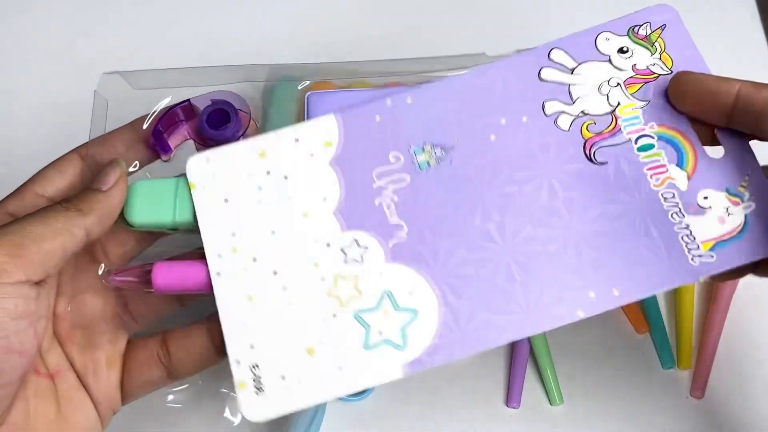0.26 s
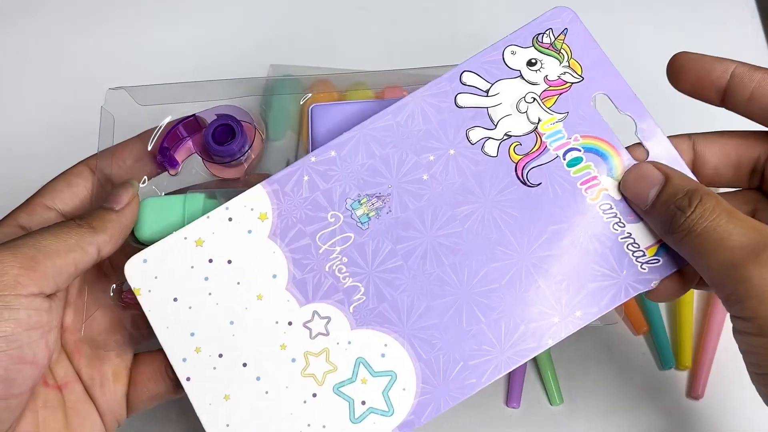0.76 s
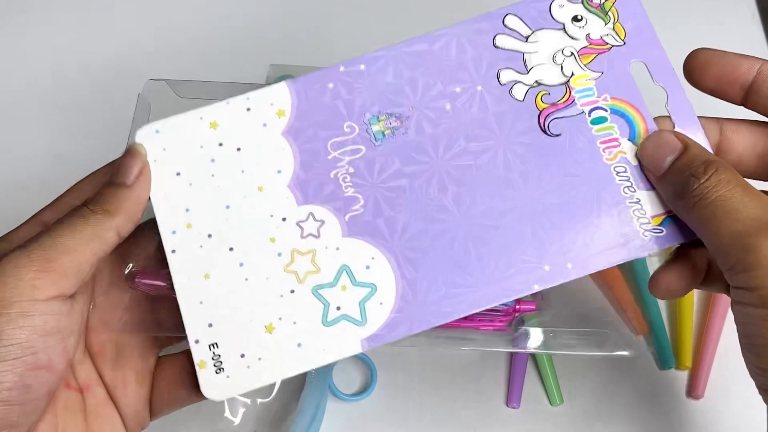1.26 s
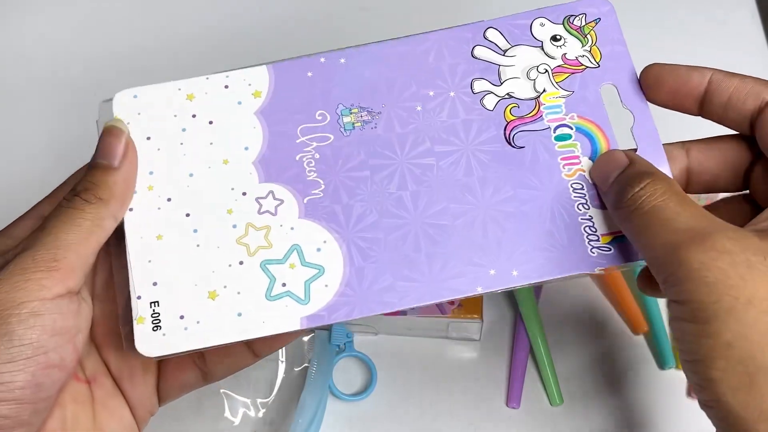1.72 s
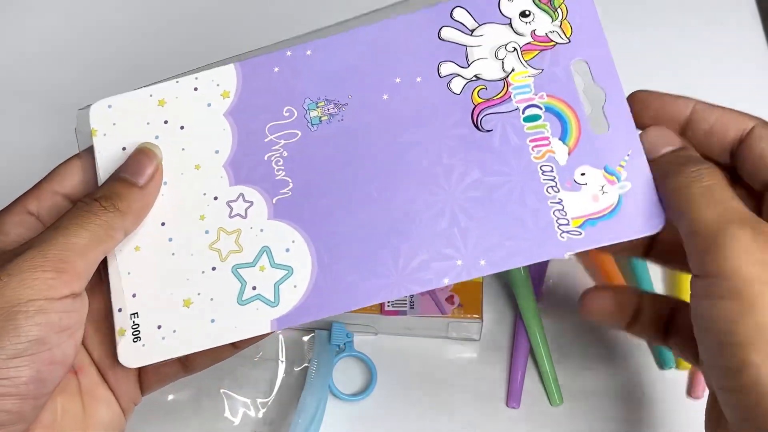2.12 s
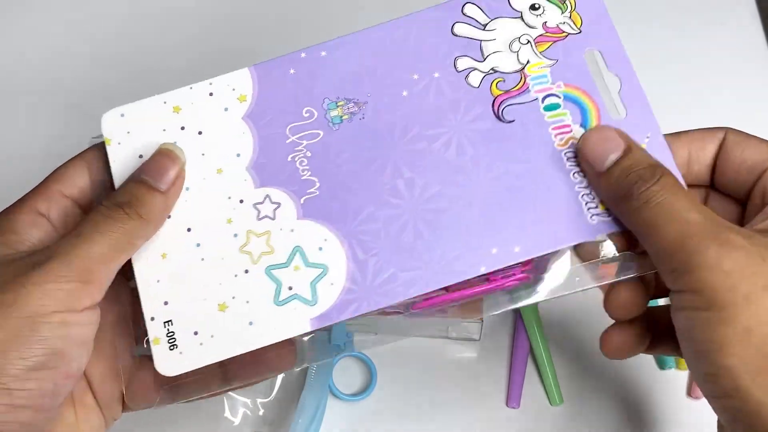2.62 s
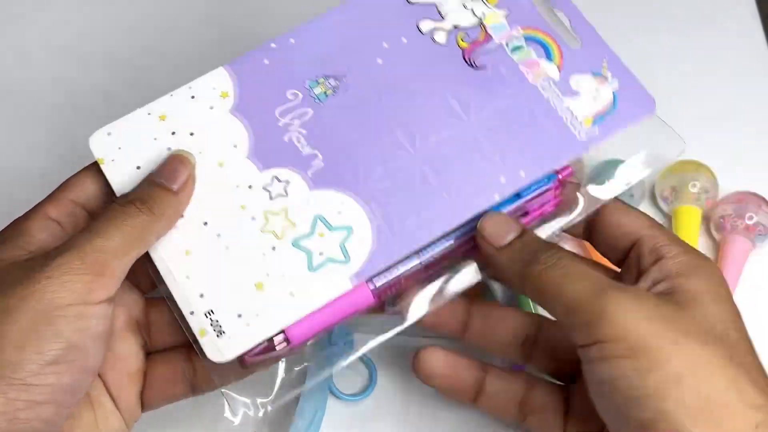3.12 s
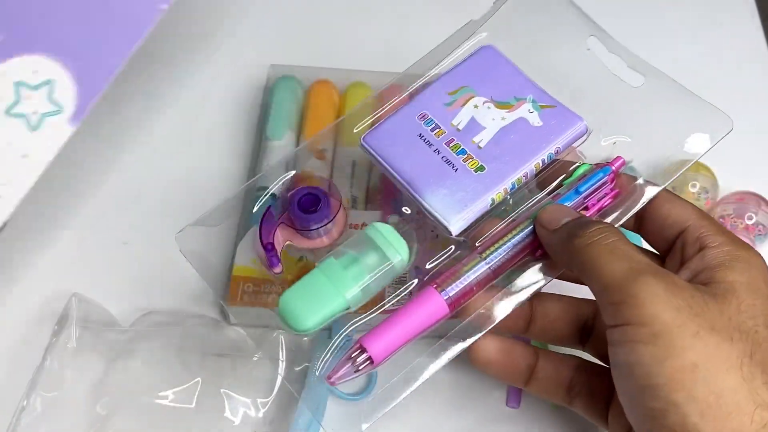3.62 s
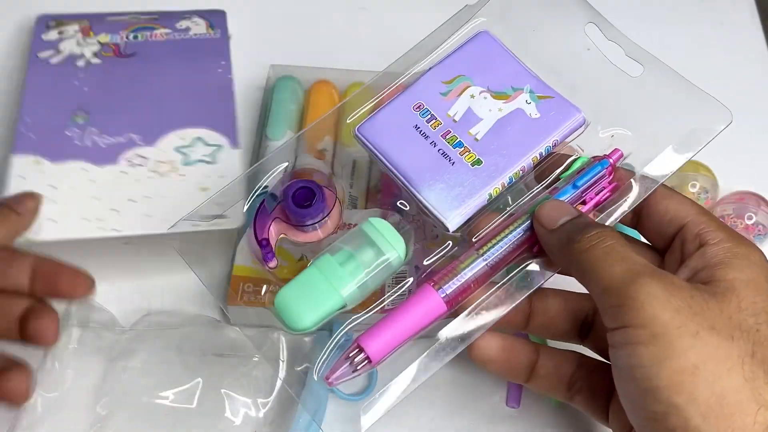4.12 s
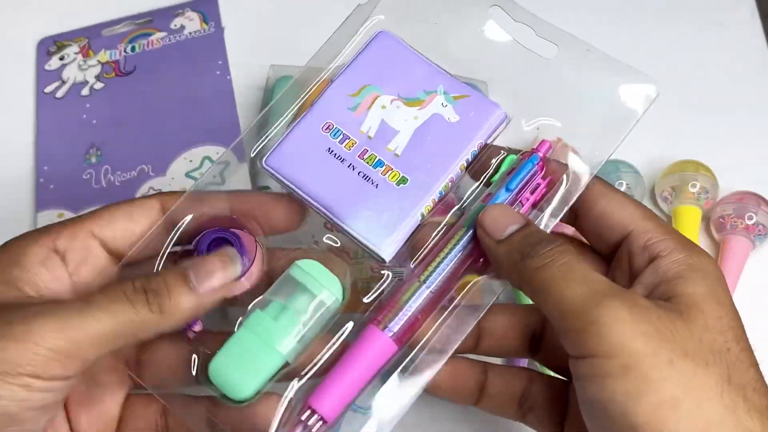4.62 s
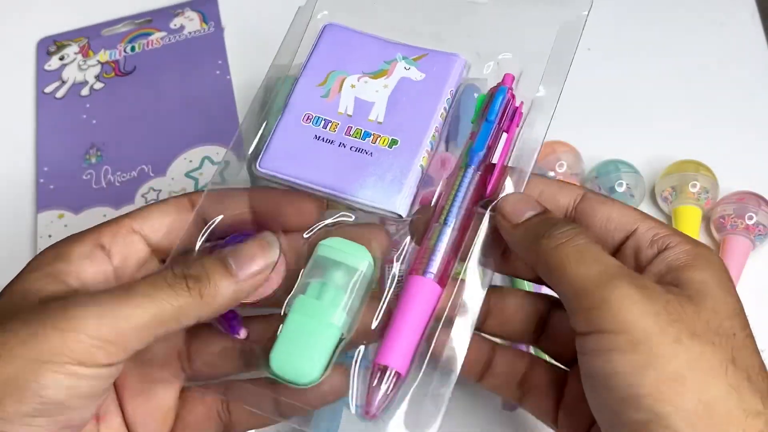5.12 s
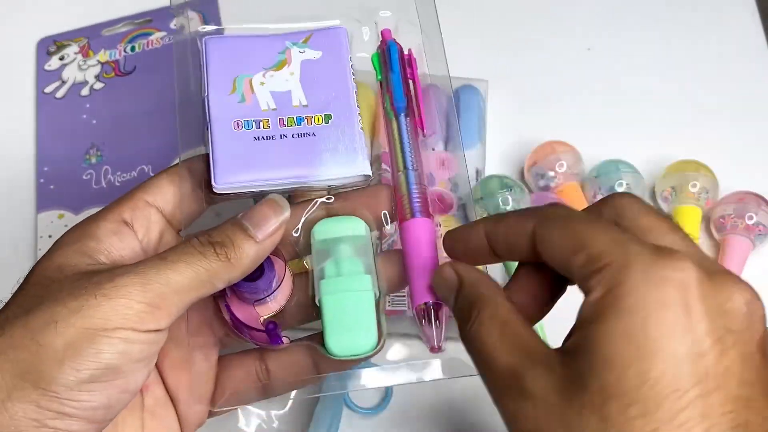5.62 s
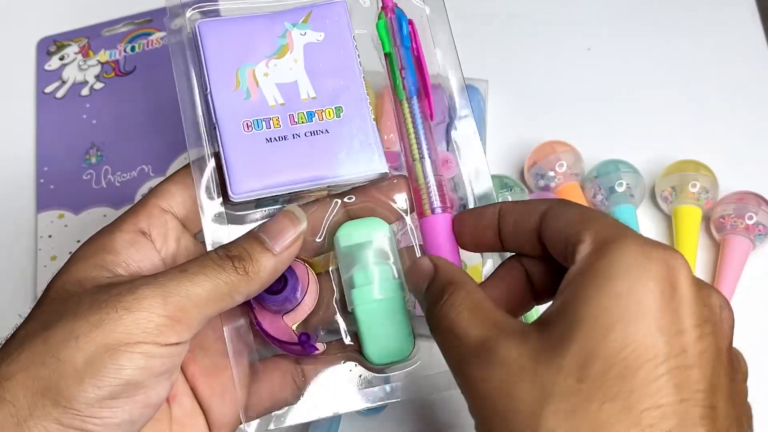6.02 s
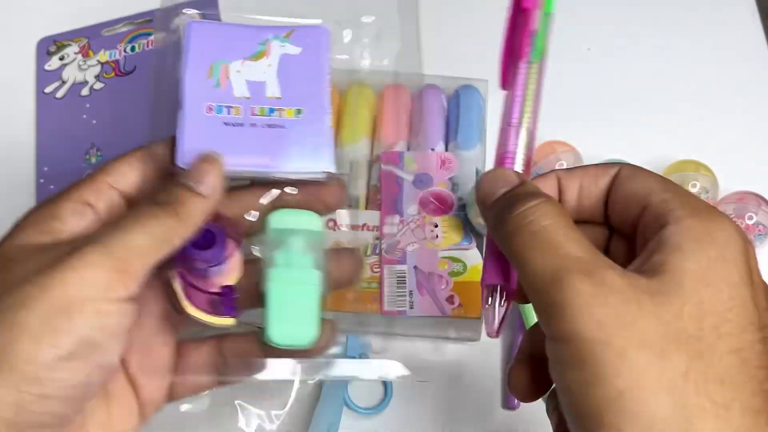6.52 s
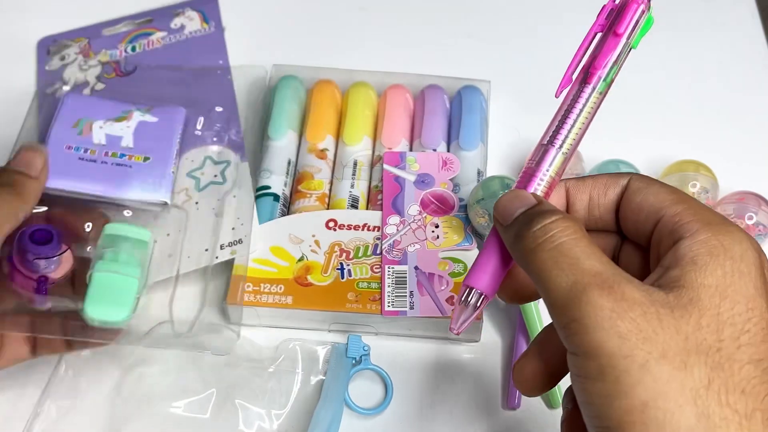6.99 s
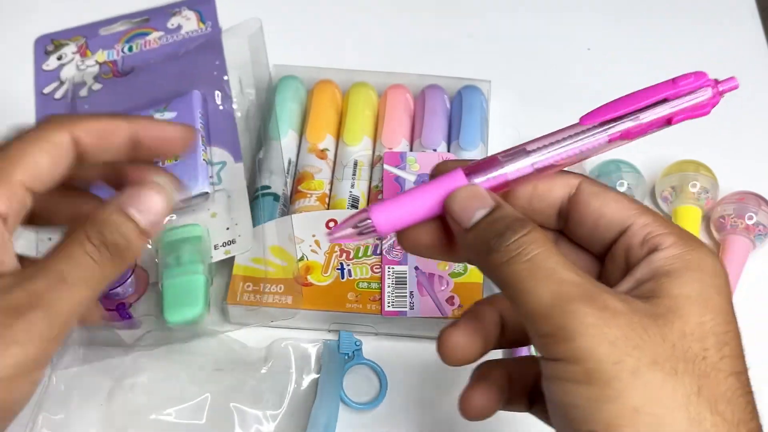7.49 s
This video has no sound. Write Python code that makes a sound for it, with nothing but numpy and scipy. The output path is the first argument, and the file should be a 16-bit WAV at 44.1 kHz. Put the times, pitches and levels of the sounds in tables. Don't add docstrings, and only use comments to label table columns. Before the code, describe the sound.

Hands handle a stiff plastic blister tray with a card backing, very close to a phone in a small hard room. Quiet ticks and rubs come first, with crisp cracks around one and two and a half seconds. The card slides out and taps down softly. Near six seconds the tray snaps sharply, loudest as the pen springs out with a short hollow ring, then lighter clicks follow over low traffic rumble.

```python
import sys
import numpy as np
from scipy import signal
from scipy.fft import rfft, irfft, next_fast_len
from scipy.io import wavfile
from scipy.ndimage import uniform_filter1d, map_coordinates

SR = 44100
rng = np.random.default_rng(int(sys.argv[2]) if len(sys.argv) > 2 else 0)


def voltage_ratio(level):
    return 10 ** (np.asarray(level, float) / 20)


def store_wav(level_fs):
    pcm = np.round(np.clip(np.atleast_2d(level_fs), -1, 1) * 32767)
    wavfile.write(sys.argv[1], SR, pcm.T.astype(np.int16))


N = 341775

# start_s, level_db, pitch_hz, length_ms, sharpness_db
BUCKLES = [(0.9962, -29.5, 1196, 1.15, -9.5), (1.0034, -34, 2720, 4.8, -5), (1.457, -44, 1340, 4.4, -1.5),
           (1.91, -38, 2560, 1.3, 5.5), (1.949, -40, 1840, 3, -6), (2.5503, -29, 2480, 17.4, -1.5),
           (3.253, -41.5, 850, 5.4, -9), (3.3826, -41, 1520, 16, 9.5), (3.397, -39, 2600, 21.4, 4),
           (3.4869, -38, 3350, 2.9, 0.5), (4.207, -36.5, 1150, 2.6, -14), (4.2134, -32.5, 1015, 2.2, -6),
           (4.6187, -33.5, 1950, 4.7, -14.5), (4.643, -38, 986, 0.48, -21), (5.8386, -23, 1100, 2.2, -3.5),
           (5.8392, -28.5, 4430, 1.2, -3.5), (6.3395, -26, 6050, 1.7, -6), (6.037, -30, 5900, 1.4, -6),
           (5.9755, -29, 4600, 1.2, -2), (6.0369, -21, 4540, 2.7, 3.5), (6.3386, -15, 1146, 3.4, -3),
           (6.539, -39.5, 2904, 9, -9), (6.726, -40.5, 3000, 6.6, -13), (6.855, -34.5, 2440, 1.75, -9),
           (7.0731, -34.5, 1140, 2.7, -19.5), (7.2577, -38, 877, 1.3, -16), (7.326, -39, 1240, 3.05, -27)]


def buckles():
    rows = []
    for start, db, hz, length_ms, sharp_db in BUCKLES:
        body_db = -3 - 0.45 * sharp_db
        rows.append((start, db, body_db, sharp_db, hz, length_ms))
    return cracks(rows)


# start_s, level_db, pitch_hz, length_ms
SNAPS = [(.1695, -49.5, 3300, 7), (.2681, -49, 1130, 6.5), (.3301, -53, 2690, 0.6), (.3449, -49, 2820, 1.9),
         (.8181, -60, 1170, 9.7), (1.3432, -51, 2800, 4.6), (1.5433, -54, 1790, 4.9), (1.8, -53, 805, 4.7),
         (1.8698, -48, 2510, 2.5), (1.9729, -46, 3180, 12.6), (2.1122, -48, 2680, 0.66),
         (2.2005, -50.5, 2350, 7.4), (2.4606, -51.5, 2530, 7.2), (2.4702, -55.5, 2100, 9.7),
         (6.3432, -34, 4300, 1.3), (3.4642, -45, 2470, 9.1), (4.5305, -57, 2800, 17),
         (4.6015, -47.5, 2480, 14), (4.9678, -48.5, 2400, 5.2), (5.1416, -65, 730, 13),
         (5.1632, -58, 2573, 1.2), (6.1918, -50.5, 579, 27)]


def snaps():
    return cracks(same_kind(SNAPS, body_db=1.5, edge_db=-0.5))


# start_s, level_db, pitch_hz, length_ms
KNOCKS = [(.2305, -50.5, 1143, 4.3), (.2554, -46.5, 2580, 7), (.3519, -70, 1180, 4.7),
          (.3632, -46.5, 2160, 1.3), (.377, -53, 1130, 2), (.5905, -63, 1040, 15),
          (1.1334, -46.5, 1840, 4.9), (2.218, -58, 980, 4.6), (2.2274, -54.5, 950, 3.2),
          (2.8959, -49.5, 900, 1.2), (3.1684, -56.5, 2260, 82), (3.2402, -46.5, 1310, 5.8),
          (3.5147, -49, 860, 1.7), (4.1317, -63, 2650, 3.4), (4.154, -55, 1180, 10.6),
          (4.1897, -48.5, 1390, 3), (4.8358, -59.5, 1070, 5.3), (5.0164, -55, 1050, 1.8),
          (5.0678, -52.5, 620, 3), (5.1299, -47, 503, 1.7), (5.2936, -47.5, 1078, 7.4),
          (6.3494, -29.5, 1073, 7.4), (6.9405, -41, 1056, 1.4), (6.9547, -52, 1212, 12),
          (7.3152, -48.5, 1230, 8.8)]


def knocks():
    return cracks(same_kind(KNOCKS, body_db=7, edge_db=-5.5))


# start_s, level_db, pitch_hz, length_ms
BUMPS = [(1.485, -58.5, 950, 3.8), (2.787, -57, 850, 1.9), (2.8128, -55, 910, 2.9), (2.9319, -50, 833, 2),
         (3.151, -53, 794, 4.5), (4.2922, -61.5, 1330, 4.6), (5.2592, -57, 657, 1.7),
         (5.5819, -56.5, 1115, 3.3), (5.7798, -62, 746, 4), (5.8107, -58, 940, 1.6),
         (5.9865, -57, 960, 5.5), (6.243, -51.5, 958, 5.5), (7.1491, -51, 1178, 3.8),
         (7.2165, -48.5, 910, 0.88)]


def bumps():
    return cracks(same_kind(BUMPS, body_db=11.5, edge_db=-12))


# start_s, level_db, pitch_hz, length_ms
TICKS = [(.4459, -65, 2790, 5.1), (.4688, -60, 4130, 4.5), (6.3393, -28, 4325, 0.34),
         (1.7838, -63, 2510, 1), (2.0403, -59.5, 2180, 11), (2.0906, -54.5, 4400, 13),
         (2.2867, -58, 2560, 7), (1.888, -55, 2530, 4), (2.2405, -62, 3470, 1), (2.5548, -25, 2180, 1.1),
         (2.8896, -58, 3210, 1.1), (5.798, -63, 3200, 3), (4.662, -55, 4020, 1.8), (4.7897, -65.5, 2900, 8),
         (4.9508, -60, 2800, 1.2), (4.9882, -52.5, 3000, 1.5), (5.0256, -58, 2500, 0.89),
         (5.1045, -55.5, 2600, 16), (5.1234, -63, 2580, 4.5), (5.142, -52, 4450, 2.7),
         (5.2885, -46, 3100, 1.3), (5.3015, -44, 2570, 3.05), (6.223, -47, 2600, 4.9),
         (6.701, -59.5, 2600, 20), (6.738, -59, 2260, 4.1), (6.958, -56, 2180, 7), (7.149, -56, 4050, 1)]


def ticks():
    return cracks(same_kind(TICKS, body_db=-4.5, edge_db=-11))


# start_s, level_db, pitch_hz, length_ms
RUSTLES = [(.3556, -57, 1160, 3.5), (.5771, -58, 870, 3), (1.606, -65, 786, 4), (4.632, -50.5, 900, 8.3),
           (5.657, -69.5, 1000, 4.2), (2.178, -62, 1120, 1.1), (2.9614, -59, 860, 2.4),
           (3.1445, -55, 1040, 2.7), (3.222, -50, 1320, 2.6), (3.276, -55, 684, 3.3),
           (7.487, -66.5, 1500, 6.3), (5.8445, -38.5, 777, 1.1), (6.198, -57.5, 564, 7.3),
           (6.256, -61, 616, 8.4), (6.549, -52.5, 660, 13), (6.622, -65, 1120, 5.2), (6.73, -55, 502, 8.8),
           (7.085, -58, 1010, 5.2)]


def rustles():
    return cracks(same_kind(RUSTLES, body_db=8, edge_db=-16.5))


# start_s, level_db, pitch_hz, length_ms
SCUFFS = [(.111, -49.5, 2200, 10), (.1316, -49, 3350, 25), (.4594, -47.5, 2770, 17), (.7997, -52, 834, 29),
          (1.5647, -45.5, 3400, 36), (1.7606, -61, 885, 22), (3.1333, -47, 875, 26), (3.268, -41, 2370, 36),
          (5.5747, -60.5, 1124, 13), (7.292, -45.5, 2600, 28), (.991, -44, 2270, 6.7),
          (2.545, -26, 2530, 6.9), (5.966, -38.5, 800, 5.5)]


def scuffs():
    return cracks(same_kind(SCUFFS, body_db=2.5, edge_db=3), crest_db=10.5, soft=0.019)


# start_s, level_db, pitch_hz, length_ms
TAPS = [(1.6492, -41.5, 2230, 2.2), (2.438, -47, 2290, 1.9), (3.8336, -44, 2150, 4.3),
        (3.5155, -40, 2280, 0.82), (3.8542, -32.5, 2083, 0.77), (3.9028, -39.5, 2000, 0.69)]


def taps():
    blows = cracks(same_kind(TAPS, body_db=-9.5, edge_db=-22), crest_db=0.4, soft=0.025)
    return filtered(blows, lambda hz: (1 + 1j * hz / 3780) ** -3)


def same_kind(table, body_db, edge_db):
    return [(start, db, body_db, edge_db, hz, length_ms) for start, db, hz, length_ms in table]


# frequency_hz, level_db
BODY = [(200, 10), (450, -1), (1000, 4), (1700, -5), (2400, -48.5)]
# frequency_hz, level_db
SCRAPE = [(1300, -8.5), (2000, -1.5), (3500, -4), (6000, -4), (8000, -18.5)]
# frequency_hz, level_db
EDGE = [(4500, -15), (7000, 1), (10000, -6.5), (12300, -6.5), (14500, -20.5), (16500, -24)]


def cracks(rows, crest_db=1.0, soft=0.021):
    start, db, body_db, edge_db, hz, length_ms = np.transpose(rows)[:, :, None]
    t = np.arange(SR // 11) / SR
    length = length_ms / 1000
    noise = rng.standard_normal((len(start), 5, len(t)))
    late = np.maximum(t - length, 0)
    first = 1 + 1.49 * np.exp(-length_ms / 4) * np.exp(-t / 0.0019)

    def shape(rise, t60):
        attack = (1 - np.exp(-t / (rise + soft * length))) ** 2
        return attack * voltage_ratio(-60 * late / (t60 + length))

    lumps = voltage_ratio(3 * unit(uniform_filter1d(noise[:, 4], size=35)) - 1)
    edge = voltage_ratio(edge_db - 4.5) * coloured(noise[:, 0], EDGE) * shape(0.0003, 0.00058) * first ** 2
    snap = coloured(noise[:, 1], SCRAPE) * shape(0.00041, 0.017) * first
    body = voltage_ratio(body_db) * coloured(noise[:, 2], BODY) * shape(0.00075, 0.05)
    burst = lumps * (edge + snap + body)

    drift = np.cumsum(noise[:, 3], axis=1) * (0.028 + 0.0022 * length_ms)
    low_panel = hz < 1800
    strength_db = np.where(low_panel, body_db, 0)
    panel_t60 = 29 / hz * voltage_ratio(0.17 * np.minimum(db + 36.5, 0))
    panel = voltage_ratio(strength_db - 1.5) * np.sin(2 * np.pi * hz * t + drift) * shape(0.00029, panel_t60)

    reach = np.where(low_panel, 1.0, 0.3)
    direct_gain = voltage_ratio(0.2 * np.maximum(db + 36, 0))
    near = direct_gain * (burst + panel)
    around = evened(burst) * voltage_ratio(-60 * late / 0.073) + reach * panel
    gain = voltage_ratio(db - crest_db)
    return np.array([placed(gain * sound, start[:, 0] - 0.0005) for sound in (near, around)])


def evened(rows):
    z = rfft(rows)
    smooth = np.sqrt(np.abs(uniform_filter1d(np.abs(z) ** 2, size=150)))
    return irfft(smooth * z / (np.abs(z) + 1e-12), rows.shape[1])


# start_s, length_s, level_db, brightness_db
STROKES = [(-.03, 0.046, -64.5, 18), (0.08, 0.46, -66, -4), (0.443, 0.18, -59.5, 3),
           (0.766, 0.042, -60, -13), (1.165, 0.6, -61.5, 4), (1.432, 0.13, -69.5, 18),
           (1.77, 0.45, -63.5, -1), (2.075, 0.015, -58, 2), (2.265, 0.084, -59, -9), (2.43, 0.19, -49, 1),
           (2.583, 0.15, -45, -5), (2.848, 0.19, -57, -3), (3.115, 0.22, -52, 13.5),
           (3.4, 0.24, -66.5, -13), (3.967, 0.042, -72, 18), (4.058, 0.034, -75, 12),
           (2.998, 0.32, -66.5, 8), (7.624, 0.046, -86, 18), (6.13, 0.042, -51, 4), (3.953, 0.12, -75, -1),
           (4.107, 0.24, -59, -9), (4.503, 0.22, -55.5, -2), (4.808, 0.15, -66.5, 9),
           (4.985, 0.34, -64, 15), (5.56, 0.29, -63.5, -14), (5.9, 0.057, -60, -9), (6.12, 0.31, -60.5, 13),
           (6.352, 0.14, -43, -1), (6.683, 0.023, -52.5, -4), (6.947, 0.23, -53, 3),
           (7.198, 0.21, -53.5, -8)]


def strokes(offset_db, per_brightness):
    start, length, db, bright_db = np.transpose(STROKES)[:, :, None]
    t = np.arange(0, N / SR, 1 / 500)
    rise = np.clip((t - start) / 0.028, 0, 1)
    fall = np.exp(-np.maximum(t - start - length, 0) / 0.03)
    gain = voltage_ratio(db + offset_db + per_brightness * bright_db)
    return np.interp(np.arange(N) / SR, t, np.sum(gain * rise * fall, axis=0))


def rubbing():
    draws = rng.random((6000, 3))
    t = np.arange(160) / SR
    hz = 1300 * 9 ** draws[:, 1:2]
    size = draws[:, 2:] ** -0.45
    pops = np.minimum(size, 4) * np.sin(2 * np.pi * hz * t) * np.exp(-hz * t / 0.2)
    popping = unit(placed(pops, draws[:, 0] * N / SR))
    clump = voltage_ratio(2.6 * wobble(30) + 1.8 * wobble(150))
    grit = patchy(unit(clump * (rng.standard_normal(N) + 0.8 * popping)), depth_db=2.5)
    # (offset dB, dB per dB of brightness, colour)
    layers = [(0, 0, SCRAPE), (-0.5, -0.7, BODY), (-8.5, 0.58, EDGE)]
    out = np.zeros(N)
    for offset_db, per_brightness, colour in layers:
        gain = strokes(offset_db, per_brightness) * voltage_ratio(1.5 * wobble(30) - 7)
        out += gain * coloured(grit, colour)
    return out


def patchy(x, depth_db):
    z = signal.stft(x, nperseg=256)[2]
    field = uniform_filter1d(rng.standard_normal(z.shape), size=4, axis=0)
    field = uniform_filter1d(field, size=10, axis=1)
    return signal.istft(z * voltage_ratio(depth_db * field / field.std()), nperseg=256)[1][:N]


# frequency_hz, level_db, t60_s
HOLLOW = [
    (1120, -0.5, 0.21),
    (1070, -8.5, 0.059),
    (2600, -13, 0.1),
    (1570, -14, 0.1),
    (900, -7, 0.1),
]


def hollow():
    hz, db, t60 = np.transpose(HOLLOW)[:, :, None]
    t = np.arange(SR // 3) / SR
    drift = 0.033 * np.cumsum(rng.standard_normal((len(hz), len(t))), axis=1)
    decay = voltage_ratio(-23 + db - 60 * t / t60) * (1 - np.exp(-t / 0.002))
    rings = decay * np.sin(2 * np.pi * hz * t + drift)
    return placed(rings, np.full(len(hz), 6.3405))


# frequency_hz, width_hz, level_db
TRAY = [
    (1070, 76, -4.5),
    (1600, 250, -11),
    (2580, 300, 11),
    (4600, 5800, -8.5),
]


def tray(x):
    def response(f):
        ring = 0
        for k, (centre, width, db) in enumerate(TRAY):
            damping = 1j * f * width
            ring = ring + (-1) ** k * voltage_ratio(db) * damping / (centre ** 2 - f ** 2 + damping)
        return (1 + 0.097 * ring) * (1j * f / (250 + 1j * f)) ** 4
    return filtered(x, response)


# start_s, level_db (peak), pitch_hz
THUDS = [(1, -42, 82), (1.967, -44, 67.5), (2.547, -56, 227), (3.493, -40, 56), (4.252, -48.5, 126),
         (4.62, -48, 136), (5.284, -51, 169), (6.037, -49, 276), (6.336, -36, 150), (6.724, -52.5, 251),
         (7.076, -45, 255), (7.257, -41, 103.5)]


def thuds():
    start, db, hz = np.transpose(THUDS)[:, :, None]
    t = np.arange(SR // 5) / SR
    puff_colour = [(60, -7), (150, -5.5), (400, -13), (800, -37), (3000, -91)]  # (Hz, dB)
    puff = coloured(rng.standard_normal((len(start), len(t))), puff_colour)
    envelope = (1 - np.exp(-t / 0.004)) * voltage_ratio(-60 * t / 0.16)
    push = (np.sin(2 * np.pi * hz * t) + 0.6 * puff) * envelope
    return placed(voltage_ratio(db + 1) * push, start[:, 0])


# start_s, end_s, frequency_hz, width_hz, level_db
SWISHES = [(3.64, 4.03, 880, 210, -68.5), (3.56, 3.77, 2560, 300, -74), (0.017, 0.13, 3700, 570, -67.5),
           (6.1, 7, 900, 610, -65), (6.2, 7.52, 1360, 350, -71.5), (3.62, 5.6, 3000, 2200, -79),
           (5.6, 5.2, 2630, 170, -78.5), (4.4, 5.84, 520, 260, -83), (8.4, 7.72, 1500, 670, -77.5),
           (0.099, .17, 3060, 250, -55), (3.93, 4.15, 6900, 5000, -76), (6.9, 7.45, 14500, 1500, -83),
           (4.7, 5.35, 14500, 1500, -84)]


def swishes():
    t, out = np.arange(N) / SR, np.zeros(N)
    for start, end, hz, width_hz, db in SWISHES:
        band = unit(filtered(rng.standard_normal(N), lambda f: np.exp(-((f - hz) / width_hz) ** 2)))
        out += voltage_ratio(db) * np.clip(np.minimum(t - start, end - t) / 0.079, 0, 1) * band
    return out


# frequency_hz, t60_s
ROOM = [(200, 0.58), (1000, 0.25), (3000, 0.35), (7000, 0.32), (14000, 0.3)]
# frequency_hz, level_db
ROOM_DB = [(200, -6), (1000, -5.5), (3000, -3), (7000, -7), (14000, -4.5)]
# frequency_hz, correlation
ALIKE = [(50, .98), (300, .5), (1000, .3), (2000, .15), (3200, .75), (4200, .97), (6000, .75), (9000, .97),
         (11000, .7), (13000, .95), (15000, .6)]


def room(x):
    out, step, gap = np.zeros((2, N + 2 * SR)), SR // 3, int(0.006 * SR)
    for at in range(0, N, step):
        hz, t, z = signal.stft(rng.standard_normal((2, SR * 3 // 5)), SR, nperseg=256)
        t60 = along(ROOM, hz)[:, None]
        decay = voltage_ratio(along(ROOM_DB, hz)[:, None] - 60 * t / t60)
        equal_energy = np.sqrt(t60 * SR / np.log(1e6))
        tail = signal.istft(z * decay / equal_energy, SR, nperseg=256)[1]
        tail = tail * (1 - np.exp(-np.arange(tail.shape[1]) / (0.00019 * SR)))
        wet = signal.fftconvolve(x[None, at:at + step], tail, axes=1)
        out[:, at + gap:at + gap + wet.shape[1]] += wet
    return spread(out[:, :N], ALIKE)


# time_s, level_db
TRAFFIC = [(0, -62.5), (.5, -67.5), (1.4, -64), (1.8, -73), (2.3, -60), (3, -57), (3.65, -63.5),
           (4.2, -69.5), (4.8, -66), (5.4, -71), (5.75, -58.5), (6.3, -57), (6.8, -60), (7.3, -53),
           (7.6, -66.5), (7.75, -73.5)]
# middle_s, half_width_s, level_db
DRONES = [
    (.3, 0.27, -48.5),
    (1.05, .1, -83),
    (2.35, 0.21, -59),
    (4.3, 0.7, -64),
    (6.369, 0.072, -48.5),
    (7.151, 0.14, -52.5),
]
# frequency_hz, level_db (per Hz)
AIR = [(25, -22), (52, -7), (100, -13), (200, -20), (330, -21), (550, -33), (1500, -49), (4000, -52),
       (8000, -58), (16000, -64)]


def rumble():
    t = np.arange(N) / SR
    traffic_db = np.interp(t, *np.transpose(TRAFFIC))
    deep_colour = [(28, -25), (42, -6), (50, 0), (58, -5), (75, -25), (150, -120)]  # (Hz, dB)
    deep = coloured(rng.standard_normal(N), deep_colour)
    swell = voltage_ratio(-69.5) + sum(voltage_ratio(db) * np.exp(-((t - middle) / half) ** 2) for middle, half, db in DRONES)
    drone_colour = [(48, -25.5), (62, 1), (79, 8.5), (100, -31), (200, -120)]  # (Hz, dB)
    drone = coloured(rng.standard_normal(N), drone_colour)
    air = coloured(spread(rng.standard_normal((2, N)), ALIKE), AIR)
    return voltage_ratio(traffic_db + 0.5) * deep + voltage_ratio(-4.5) * swell * drone + voltage_ratio(-62) * air


# start_s, end_s, pitch_hz, level_db
FAR_TONES = [
    (0.425, 0.943, 545, -73.5),
    (3.93, 4.0, 863, -76),
    (3.99, 4.06, 1870, -72),
    (4.035, 4.135, 1850, -69.5),
    (7.43, 7.5, 1300, -72),
    (5.346, 5.43, 548, -79),
    (5.5, 5.622, 542, -66.5),
]


def street():
    t, out = np.arange(N) / SR, np.zeros(N)
    for start, end, hz, db in FAR_TONES:
        swell = np.clip(np.minimum(t - start, end - t) / 0.026, 0, 1)
        phase = 2 * np.pi * hz * t + 1.5 * wobble(25) + 0.4 * wobble(120)
        out += voltage_ratio(db + 2.2 * wobble(27)) * swell * np.sin(phase)
    return out


def unit(x):
    return x / np.sqrt(np.mean(x ** 2, axis=-1, keepdims=True) + 1e-20)


def along(points, hz):
    f, v = np.transpose(points)
    return np.interp(np.log(hz + 1), np.log(f + 1), v)


def wobble(rate):
    knots = rng.standard_normal(int(N * rate / SR) + 4)
    return map_coordinates(knots, [np.arange(N) * rate / SR])


def filtered(x, response):
    n = x.shape[-1]
    m = next_fast_len(n + min(n, SR) // 4)
    return irfft(rfft(x, m) * response(np.fft.rfftfreq(m, 1 / SR)), m)[..., :n]


def coloured(x, spectrum):
    return unit(filtered(x, lambda hz: voltage_ratio(along(spectrum, hz))))


def spread(pair, alike):
    def weights(hz):
        angle = np.arccos(np.clip(along(alike, hz), -1, 1)) / 2
        return np.array([np.cos(angle), np.sin(angle)])
    mid, side = filtered(pair, weights)
    return np.array([mid + side, mid - side])


def placed(rows, start):
    at = np.round(start * SR).astype(int)[:, None] + np.arange(rows.shape[1])
    return np.bincount(at.ravel(), rows.ravel(), N + SR)[:N]


def scene():
    hard = buckles() + snaps() + knocks() + bumps() + ticks() + rustles()
    near, around = tray(hard + scuffs() + taps() + hollow() + rubbing()) + thuds()
    return near + room(around) + rumble() + street() + swishes()


BANDS = [3450, 5000, 6550, 6850, 7200, 7700, 8200, 9700, 10200, 11800, 13700, 14300, 15000, 15900]


def band_gated(x, weak_db, faint_db, floor_db):
    hz, _, z = signal.stft(np.array([x[0] + x[1], x[0] - x[1]]) / 2, SR, nperseg=512)
    power = np.abs(z) ** 2
    whole = power[:, hz > 500].sum(axis=(0, 1))
    calm = (whole < 4 * uniform_filter1d(whole, size=7)) | (whole < 3 * np.roll(whole, 2))
    threshold = voltage_ratio(2 * faint_db) * uniform_filter1d(whole, size=5) + voltage_ratio(2 * floor_db)
    for lo, hi in zip(BANDS, BANDS[1:]):
        band = (hz >= lo) & (hz < hi)
        level = uniform_filter1d(power[:, band].mean(axis=1), size=5)
        weak = level < voltage_ratio(2 * weak_db) * level[::-1]
        faint = (level < threshold) & (lo >= BANDS[-4])
        z[:, band] *= ~((weak | faint) & calm)[:, None]
    z[:, hz >= BANDS[-1]] *= ~calm
    mid, side = signal.istft(z, SR, nperseg=512)[1][:, :N]
    return np.array([mid + side, mid - side])


def band_limit(x):
    return signal.sosfilt(signal.butter(12, 17100, fs=SR, output="sos"), x)


# frequency_hz, left_over_right_db
LEFT_DB = [(80, 0), (200, -1.3), (1500, -1), (2500, 2), (3500, 0)]
# frequency_hz, left_lead_rad
LEAD = [(0, 0), (2400, 0), (3100, -.35), (4900, -.2), (5500, 2.2), (6500, 2.5), (7100, 3.4), (7900, 5.7),
        (9500, 6.3), (10600, 7.6), (12300, 9.3), (13500, 9.9), (14700, 11.6), (16000, 12.4)]


def record(dry):
    half = np.array([[0.5], [-0.5]])

    def response(hz):
        ports = voltage_ratio(half * along(LEFT_DB, hz)) * np.exp(1j * half * along(LEAD, hz))
        top_cut = (hz < 16500) / (1 + (hz / 15900) ** 60)
        bass_cut = 1 / (1 + (36 / (hz + 1)) ** 8)
        return ports * top_cut * bass_cut

    rounded = dry / (1 + np.abs(dry / 0.8) ** 6) ** (1 / 6)
    mix = band_gated(filtered(rounded, response), weak_db=-6.5, faint_db=-39.5, floor_db=-113)
    return band_limit(mix)


dry = scene()
out = record(dry)
store_wav(out)
```